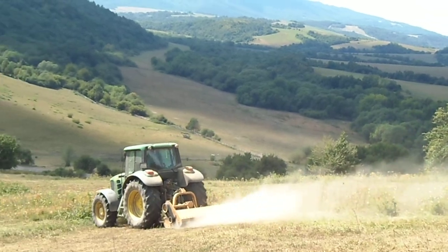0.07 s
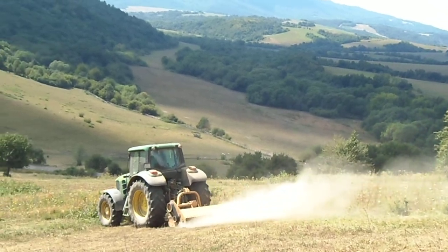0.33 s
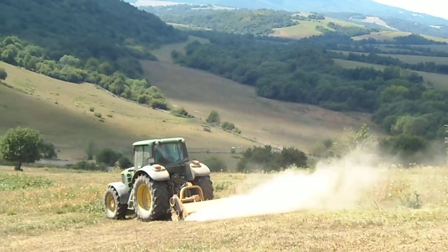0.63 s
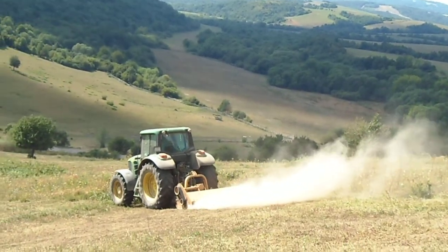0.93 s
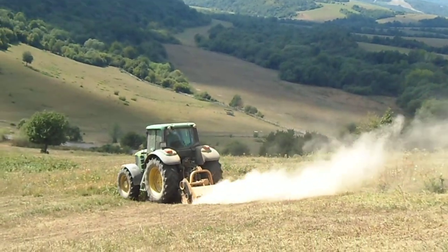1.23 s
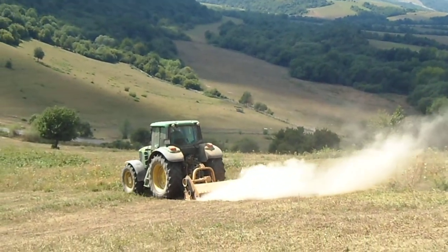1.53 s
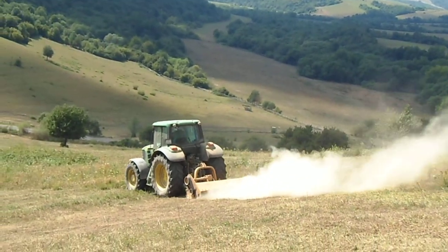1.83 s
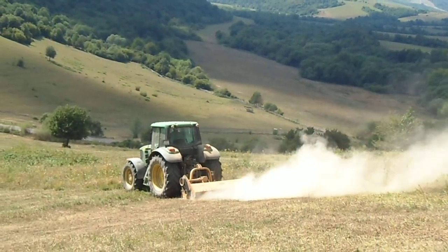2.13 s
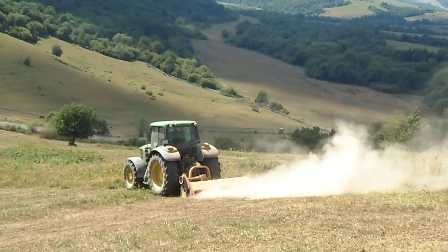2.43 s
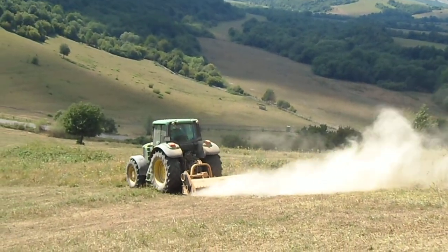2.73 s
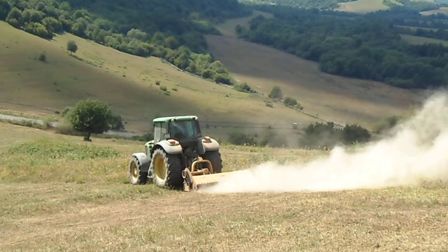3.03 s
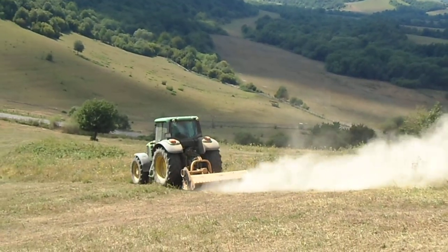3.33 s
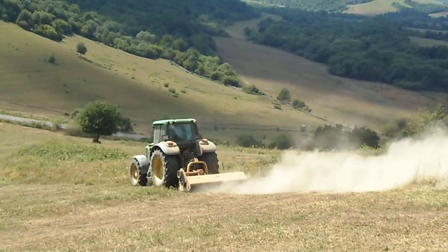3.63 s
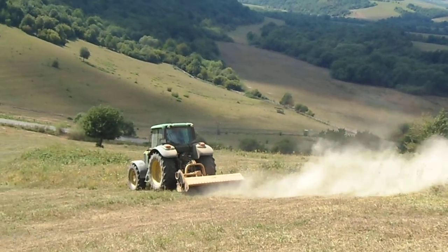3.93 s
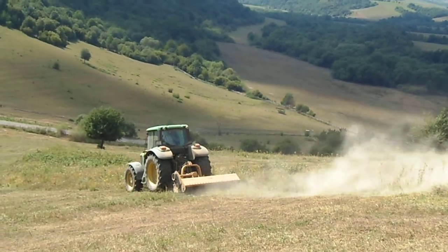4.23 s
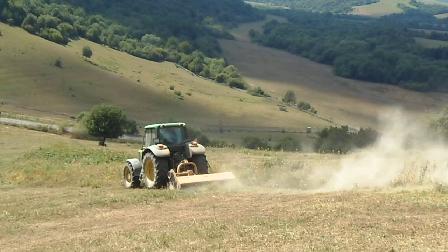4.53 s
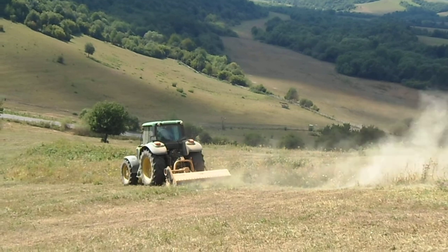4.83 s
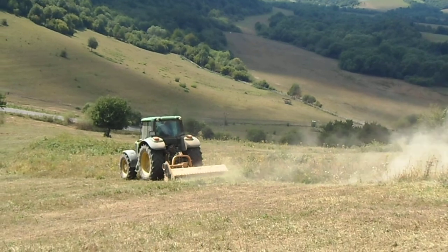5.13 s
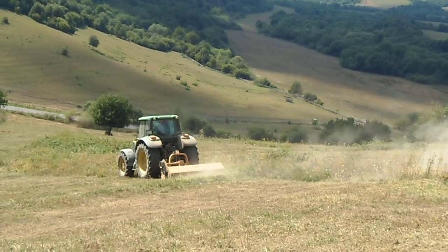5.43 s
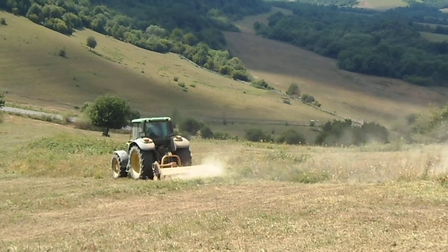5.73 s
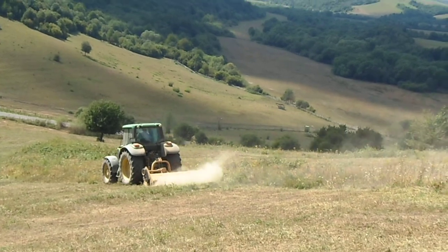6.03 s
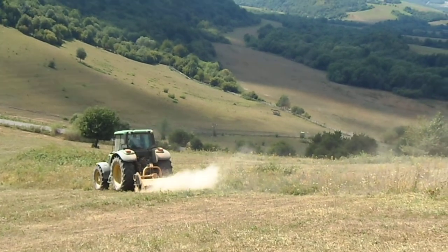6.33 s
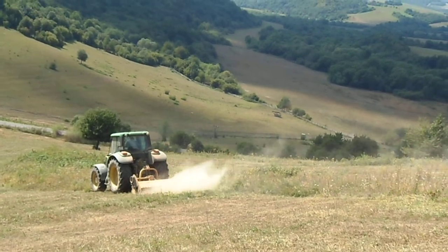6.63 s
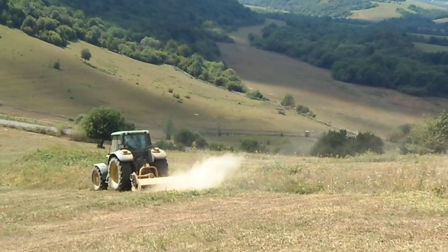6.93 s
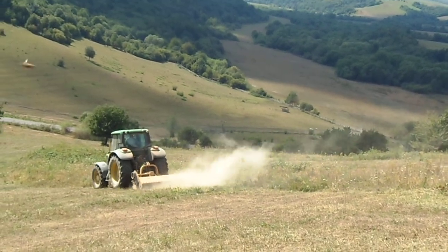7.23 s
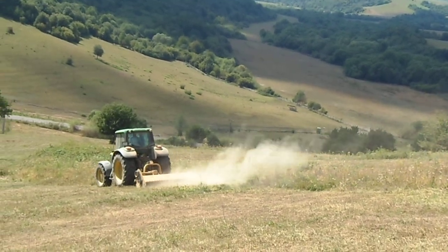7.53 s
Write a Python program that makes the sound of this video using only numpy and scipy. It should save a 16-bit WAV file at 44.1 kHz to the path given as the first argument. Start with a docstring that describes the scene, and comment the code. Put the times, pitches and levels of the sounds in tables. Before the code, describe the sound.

Steel mulcher blades clatter and crackle through dry grass behind a droning diesel tractor, slowly receding under rumbling wind gusts.

```python
"""A flail mulcher behind a tractor works a dry hillside, some way off, and slowly draws away.
Its steel flails jingle on their pins, throw soil against the hood, shred brittle stalks and hit stones.
Engine and rotor drone under a blurred diesel clatter and a thin gear whine.
Gusty wind buffets the microphone, harder towards the end."""
import sys
import numpy as np
from scipy.fft import rfft, irfft, next_fast_len
from scipy.io import wavfile
from scipy.ndimage import uniform_filter1d, minimum_filter1d, map_coordinates

SR = 44100
rng = np.random.default_rng(int(sys.argv[2]) if len(sys.argv) > 2 else 0)


def persist_wave(psi):
    """Save psi, clipped to +-1, as 16-bit WAV."""
    counts = np.round(np.clip(psi, -1, 1) * 32767).astype(np.int16)
    wavfile.write(sys.argv[1], SR, np.atleast_2d(counts).T)


N = 343533
TIME_S = np.arange(N) / SR


def amp(db):
    """dB to gain."""
    return 10 ** (np.asarray(db) / 20)


def unit(x):
    """x at rms 1."""
    return x / np.sqrt(np.mean(x ** 2) + 1e-20)


def noise():
    """White noise."""
    return rng.standard_normal(N)


def curve(rows):
    """(t/s, value) rows, interpolated per sample."""
    return np.interp(TIME_S, *np.transpose(rows))


def wobble(rate_hz):
    """Smooth random curve, rate_hz knots a second."""
    knots = rng.standard_normal(int(N * rate_hz / SR) + 4)
    return map_coordinates(knots, [TIME_S * rate_hz])


def impacts(rate_hz, spread_db):
    """Random impulses of scattered size, rms 1."""
    hits = rng.random(N) < rate_hz / SR
    return unit(hits * amp(spread_db * np.clip(noise(), -2, 2)))


def filtered(x, response):
    """x through the gain response(f/Hz)."""
    size = next_fast_len(N + SR // 2)
    return irfft(rfft(x, size) * response(np.fft.rfftfreq(size, 1 / SR)), size)[:N]


def coloured(x, spectrum):
    """x shaped by (f/Hz, level/dB) rows, rms 1."""
    hz, db = np.transpose(spectrum)
    return unit(filtered(x, lambda f: amp(np.interp(np.log(f + 1), np.log(hz), db))))


def ring(x, hz, width_hz):
    """x through one damped mode."""
    return filtered(x, lambda f: 1j * f * width_hz / (hz ** 2 - f ** 2 + 1j * f * width_hz))


# Steel flail modes: f/Hz, width/Hz, relative level/dB
FLAIL_MODES = [(4280, 30, -6), (4455, 35, -3), (5200, 200, -6), (5450, 120, -7), (5595, 30, -3),
               (5770, 80, -4), (5885, 45, 0), (6195, 45, 1), (6290, 80, -2), (6530, 90, -6), (6815, 30, -3),
               (6990, 50, -6), (7155, 35, -2), (7300, 90, -9), (7950, 35, -13), (8248, 35, -13),
               (8995, 35, -16), (9778, 35, -15)]

def flails(gain_db):
    """Flails clash in bunches; each contact rings the modes at new strengths."""
    clashes = impacts(rate_hz=500, spread_db=0.5) * amp(0.83 * wobble(28))
    steel = sum(amp(db) * ring(clashes * noise() * amp(3.4 * wobble(9)), hz, width_hz)
                for hz, width_hz, db in FLAIL_MODES)
    return amp(-42 + gain_db) * unit(steel)


# Sheet-steel hood modes: f/Hz, width/Hz, relative level/dB
HOOD_MODES = [(1636, 60, -0.5), (1680, 17, -8.5), (2017, 48, 1.5), (2159, 117, -0.5), (2233, 69, 0),
              (2294, 62, -0.5), (2497, 180, -6), (3920, 320, -7), (4330, 280, -8.5)]
# Soil impacts: f/Hz, relative level/dB
SOIL_SPECTRUM = [(500, -26), (1100, -8.5), (1500, -2), (2400, 1.5), (2900, -2.5), (3500, -0.5),
                 (4500, -1.5), (6000, 4.5), (7500, -7), (10500, -60)]

def hood(gain_db):
    """A hail of soil and chaff drums on the hood's panels."""
    hail = impacts(rate_hz=16000, spread_db=1) * noise() * amp(0.7 * wobble(30))
    panels = sum(amp(db) * ring(noise() * amp(1.17 * wobble(14)), hz, width_hz)
                 for hz, width_hz, db in HOOD_MODES)
    return amp(-38.57 + gain_db) * unit(panels) + amp(-37.5 + gain_db) * coloured(hail, SOIL_SPECTRUM)


# Breaking stalks: f/Hz, relative level/dB
STALK_SPECTRUM = [(1000, -15.5), (2500, -1.5), (3300, -9), (4300, 1.5), (5000, 1.5), (6300, 2), (7100, 0.5),
                  (7700, -3.5), (9000, -5.5), (9900, -5.5), (12000, -7.5)]

def stalks(gain_db):
    """Dry stalks tear in a dense fizz with sharper snaps on top."""
    fizz = unit(impacts(rate_hz=16000, spread_db=1) * noise())
    snaps = impacts(rate_hz=200, spread_db=0) * np.sign(noise())
    return amp(-42 + gain_db + 0.99 * wobble(35)) * coloured(fizz + amp(-12) * snaps, STALK_SPECTRUM)


# Glancing flail hits: t/s, f/Hz, relative level/dB
GLANCING_HITS = [(.17, 6810, -25), (.223, 5870, -25), (.505, 6200, -24), (.847, 6030, -28),
                 (1.05, 6200, -22), (1.243, 9010, -35), (1.549, 6980, -32), (2.02, 5260, -25),
                 (2.795, 9020, -36), (2.992, 6200, -24), (3.652, 5870, -27), (4.401, 5930, -22),
                 (5.7, 4230, -29), (6.252, 5860, -27), (6.588, 5600, -30), (6.899, 5900, -34)]

def clinks(attack_s=0.003, t60_s=0.12, jitter_rad=0.63):
    """A glancing hit leaves one flail ringing on a single bright note."""
    t = np.arange(SR // 4) / SR
    attack = 1 - np.exp(-t / attack_s)
    sound = np.zeros(N + len(t))
    for start_s, hz, db in GLANCING_HITS:
        jitter = jitter_rad * unit(uniform_filter1d(rng.standard_normal(len(t)), size=120))
        envelope = attack * amp(db - 0.5 - 60 * t / t60_s)
        sound[round(start_s * SR):][:len(t)] += envelope * np.sin(2 * np.pi * hz * t + jitter)
    return sound[:N]


# Hits on stones and thick stalks: t/s, relative level/dB
HARD_HITS = [(0.991, -24), (1.0544, -28), (1.4197, -31), (1.6263, -30), (3.6584, -18), (4.3047, -19),
             (4.34, -25), (4.365, -21), (4.403, -21), (4.4354, -17), (4.466, -20), (4.512, -26),
             (4.9003, -30), (4.9574, -21), (5.6999, -26)]

def strikes(t60_s=0.015):
    """A hard hit is a short crack that sets the flails ringing."""
    t = np.arange(SR // 4) / SR
    envelope = np.zeros(N + len(t))
    for start_s, db in HARD_HITS:
        envelope[round(start_s * SR):][:len(t)] += amp(db - 60 * t / t60_s)
    bursts = envelope[:N] * noise()
    cracks = coloured(bursts, STALK_SPECTRUM)
    steel = sum(amp(db) * ring(bursts * noise(), hz, width_hz) for hz, width_hz, db in FLAIL_MODES)
    return np.std(bursts) * (amp(-2) * cracks + amp(-1.5) * unit(steel))


# Thickness of the dry growth, as crackle gain: t/s, level/dB
GROWTH_DB = [(0, -0.5), (1.2, -2.5), (2.4, -1), (3.47, 2.5), (3.55, 7.5), (4.15, 3), (4.45, 10.5),
             (4.58, 8), (4.75, 12.5), (4.95, 7.5), (5.35, 1), (5.75, 2), (6.1, -1.5), (7.77, -2.5)]
# Bouts of harder clashing, as jingle gain: t/s, length/s, level/dB
CLASH_BOUTS = [(0.058, 0.63, 5), (1.412, .27, 5), (2.5, 0.46, 2), (3.517, 1.0, 4.5), (7.24, 0.535, 4)]

def mulcher(machine_db, bout_ramp_s=0.014):
    """The rotor feeds unevenly; thick growth adds crackle and jingle, clashing flails stir the hood."""
    growth_db = curve(GROWTH_DB)
    feed_db = 0.7 * wobble(22)
    bouts_db = sum(db * np.clip(np.minimum(TIME_S - s, s + length_s - TIME_S) / bout_ramp_s, 0, 1)
                   for s, length_s, db in CLASH_BOUTS)
    roar_db = machine_db + 0.16 * bouts_db + feed_db
    jingle_db = 1.03 * machine_db + 0.3 * growth_db + bouts_db + feed_db + 1.6 * wobble(28)
    crackle_db = 1.06 * machine_db + growth_db + feed_db + 0.95 * wobble(23)
    return hood(roar_db) + flails(jingle_db) + stalks(crackle_db) + clinks() + strikes()


# Low drone of engine and rotor: t/s, level/dB
DRONE_DB = [(0, -26), (.55, -26.5), (.9, -36), (1.25, -26.5), (2.4, -27), (2.95, -23.5), (3.7, -33.5),
            (6.1, -30), (6.65, -25.5), (7.3, -32.5)]
# Engine load, as clatter and whine gain: t/s, level/dB
LOAD_DB = [(0, -1), (1.5, 2), (2.4, -1), (3.25, 2), (3.8, -1), (4.6, 0), (5.8, 0), (7.77, 2)]
# Diesel clatter: f/Hz, relative level/dB
DIESEL_SPECTRUM = [(100, -10), (200, 4.5), (260, 6.5), (295, 12.5), (340, 4.5), (440, -5.5), (520, -4),
                   (610, -3), (730, 1), (880, 0.5), (1100, -5.5), (1400, -6.5), (2000, -10.5), (5000, -40)]
# Gear whine: f/Hz, relative level/dB
GEAR_TONES = [(547, -12), (1406, -15.5)]

def tractor(machine_db, drone_hz=149.6, hum_hz=324.3, sag_hz_per_s=0.4, fade_from_s=2.9, fade_db_per_s=2.5):
    """Drone, hum, diesel clatter and gear whine under load; moving air flutters each tone on its own."""
    drone_phase = 2 * np.pi * np.cumsum(drone_hz + 0.68 * wobble(7)) / SR
    hum_phase = 2 * np.pi * np.cumsum(hum_hz - sag_hz_per_s * TIME_S + 0.8 * wobble(8)) / SR
    hum_db = -35 + 0.53 * machine_db - fade_db_per_s * np.maximum(0, TIME_S - fade_from_s)
    drone = np.sqrt(2) * amp(curve(DRONE_DB) + 1.8 * wobble(11)) * np.sin(drone_phase)
    hum = np.sqrt(2) * amp(hum_db + 0.52 * wobble(6.8)) * np.sin(hum_phase)
    firing = 1 + 0.15 * np.cos(hum_phase / 3)
    clatter = coloured(noise() * firing, DIESEL_SPECTRUM)
    whine = np.zeros(N)
    for hz, db in GEAR_TONES:
        level = amp(db + 1.8 * wobble(11))
        whine += level * np.sin(2 * np.pi * np.cumsum(hz * (1 + 0.00311 * wobble(25))) / SR)
    gain_db = 1.27 * machine_db + curve(LOAD_DB)
    return drone + hum + amp(-35 + gain_db) * clatter + amp(-39.5 + gain_db) * whine


# Wind rumble: t/s, level/dB
RUMBLE_DB = [(0, -19), (1.6, -20), (2.15, -18.5), (2.55, -22), (3.3, -19), (3.7, -22.5), (4.3, -18.5),
             (5.3, -19.5), (6.2, -19), (7.1, -19.5), (7.77, -17.5)]
# Wind slaps: crest t/s, rumble level/dB, flutter level/dB, 1/e half-width/s
WIND_SLAPS = [(0.681, -13.5, -36, 0.014), (1.542, -19.5, -23.5, 0.095), (2.643, -27, -26.5, 0.14),
              (3.402, -21.5, -29, .04), (3.653, -19, -28, 0.023), (3.94, -17, -23, 0.023),
              (4.081, -18.5, -32, 0.014), (4.293, -18, -27.5, 0.048), (4.577, -27, -25, 0.01),
              (4.78, -16, -28, 0.025), (5.144, -19, -25, 0.035), (5.314, -28, -27, 0.01),
              (5.82, -19, -22.5, 0.015), (6.07, -26, -27, 0.11), (6.605, -22, -23, .04),
              (6.894, -17.5, -24, 0.071), (7.498, -22, -25.5, 0.043), (7.6, -30, -27, 0.15),
              (7.736, -26, -20.5, .024)]
# Wind bands, low to high: f/Hz, relative level/dB
RUMBLE_SPECTRUM = [(8, -21), (22, -1.5), (40, -1), (80, -2), (130, -4), (200, -11.5), (300, -23.5),
                   (450, -33.5), (900, -76)]
FLUTTER_SPECTRUM = [(60, -22), (170, 0), (225, 0), (280, -1), (350, -4.5), (450, -11), (700, -29),
                    (1200, -36.5), (3000, -67)]
EDGE_SPECTRUM = [(150, -21), (350, -2), (500, 0.5), (750, -9), (1100, -18.5), (2000, -43), (5000, -49.5)]

def wind(freshen_s=4.12, flutter_db_per_s=0.7, edge_db_per_s=3.5):
    """Eddies and slaps at the microphone port; as the wind freshens they reach higher frequencies."""
    pushes, slaps = np.zeros((2, N))
    for crest_s, push_db, slap_db, half_width_s in WIND_SLAPS:
        bell = np.exp(-((TIME_S - crest_s) / half_width_s) ** 2)
        pushes += amp(push_db) * bell
        slaps += amp(slap_db) * bell
    rumble_gain = np.hypot(amp(curve(RUMBLE_DB) + 0.89 * wobble(9)), pushes)
    rumble = rumble_gain * coloured(noise(), RUMBLE_SPECTRUM)
    rising_s = np.maximum(0, TIME_S - freshen_s)
    eddies = unit(amp(2.8 * wobble(45) + 1.02 * wobble(7.3)))
    force = np.hypot(amp(-30.5 + flutter_db_per_s * rising_s) * eddies, slaps)
    flutter = coloured(noise(), FLUTTER_SPECTRUM)
    edge = amp(-19 + edge_db_per_s * rising_s) * coloured(noise(), EDGE_SPECTRUM)
    return rumble + force * (flutter + edge)


# Loudness of the machine at the microphone, swelling and fading as it draws away, with sudden drops at 0.7,
# 3.38 and 5.84 s: t/s, relative level/dB
MACHINE_LEVEL_DB = [(0.0, -33), (0.48, -32.5), (0.68, -33.5), (0.7, -37), (1.48, -34.0), (1.74, -34.5),
                    (2.68, -30.5), (3.36, -32.5), (3.38, -35.0), (4.25, -33.0), (4.58, -39.0), (5.82, -34.5),
                    (5.84, -38.5), (6.7, -38.5), (7.08, -46.5), (7.34, -40.5), (7.74, -46), (7.79, -51)]

def scene(reference_db=-36):
    """Tractor and mulcher swell, flutter and fade together in the windy field."""
    machine_db = curve(MACHINE_LEVEL_DB) - reference_db + 0.68 * wobble(18)
    return (tractor(machine_db) + mulcher(machine_db) + wind())[None]


def limiter(x, threshold_db):
    """Fast gain reduction on the highest peaks."""
    needed_gain = np.minimum(1, amp(threshold_db) / (np.abs(x) + 1e-9))
    return x * uniform_filter1d(minimum_filter1d(needed_gain, size=700), size=600)


# Camera treble response: f/Hz, level/dB
TREBLE_RESPONSE = [(20, 0), (9000, 0), (9900, -7), (10400, -13.5), (10800, -27), (11050, -27.5),
                   (11700, -28), (12300, -32)]

def record(dry):
    """The camera limits wind peaks, dulls the treble and cuts off at 12.3 kHz."""
    hz, db = np.transpose(TREBLE_RESPONSE)
    limited = limiter(dry[0], threshold_db=-6)
    dulled = filtered(limited, lambda f: amp(np.interp(f, hz, db)))
    return filtered(dulled, lambda f: f < 12300)[None]


dry = scene()
out = record(dry)
persist_wave(out)
```